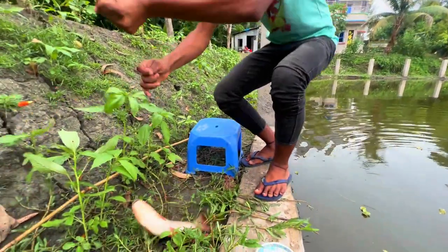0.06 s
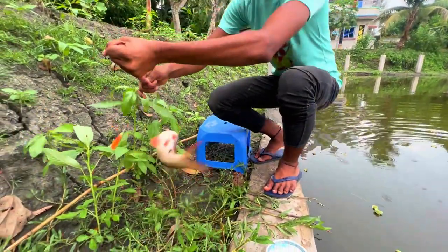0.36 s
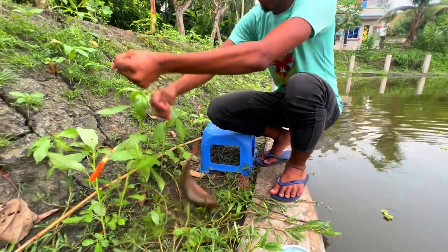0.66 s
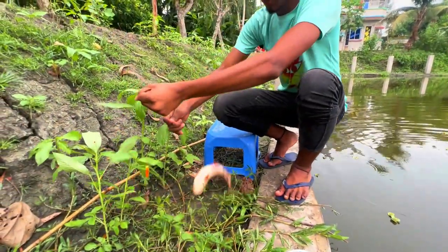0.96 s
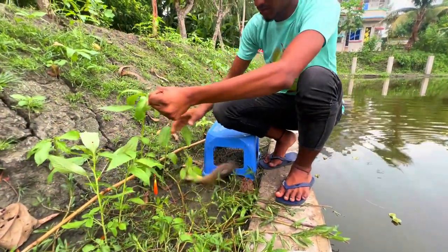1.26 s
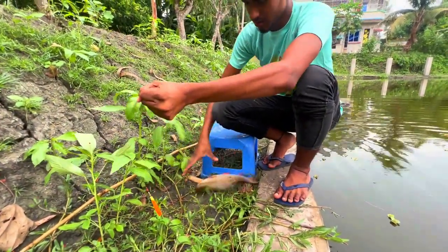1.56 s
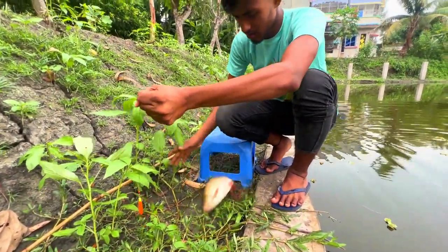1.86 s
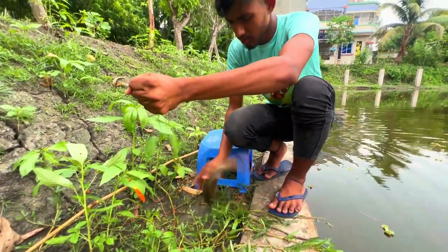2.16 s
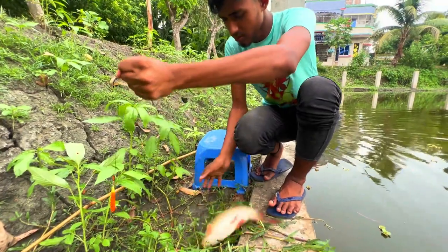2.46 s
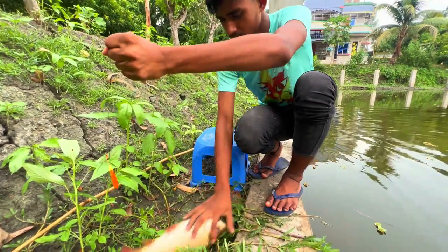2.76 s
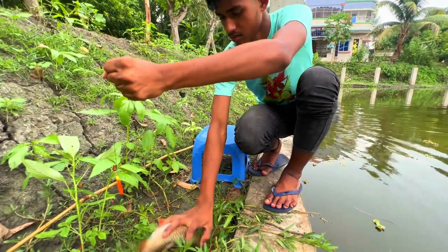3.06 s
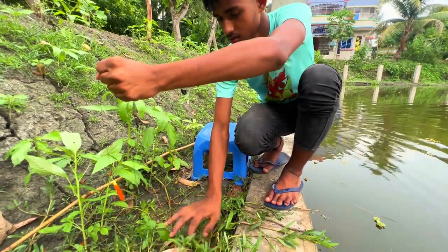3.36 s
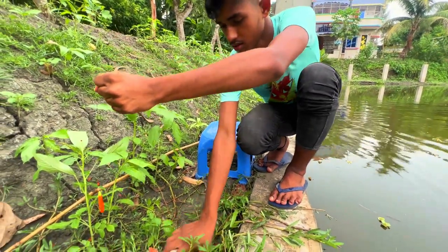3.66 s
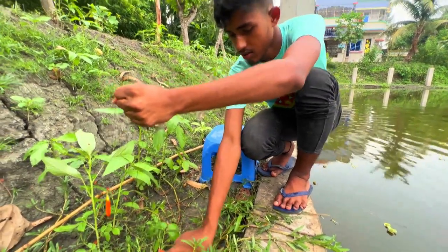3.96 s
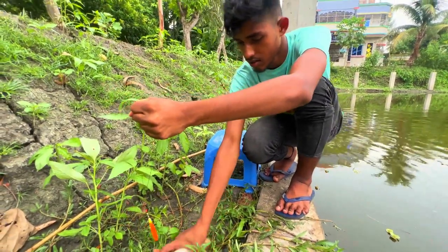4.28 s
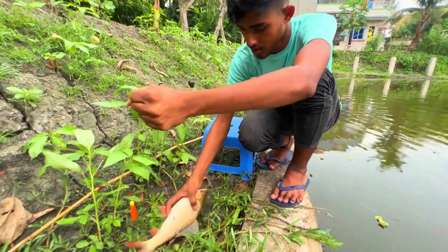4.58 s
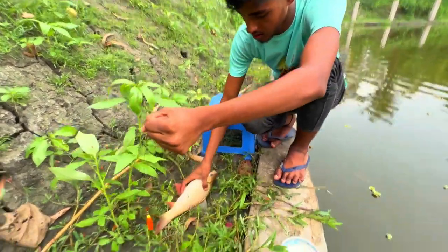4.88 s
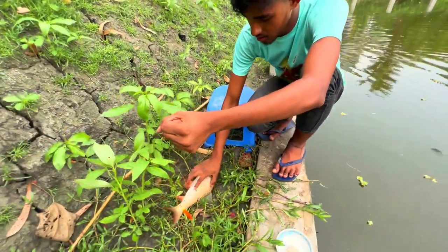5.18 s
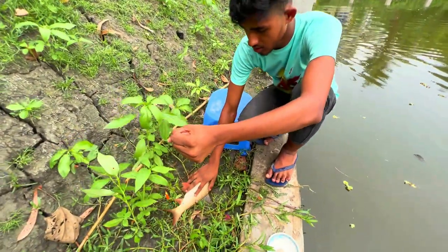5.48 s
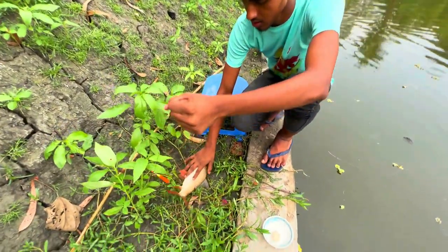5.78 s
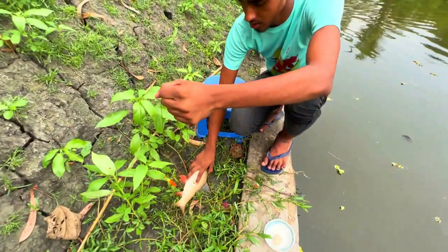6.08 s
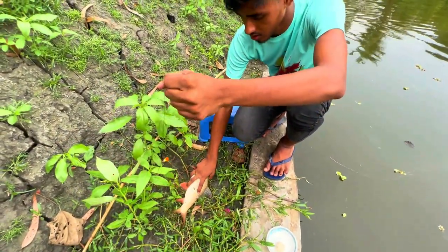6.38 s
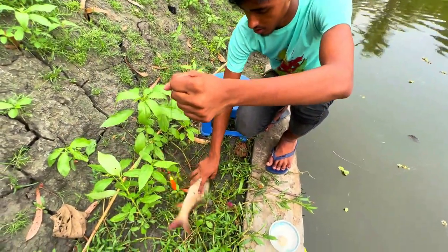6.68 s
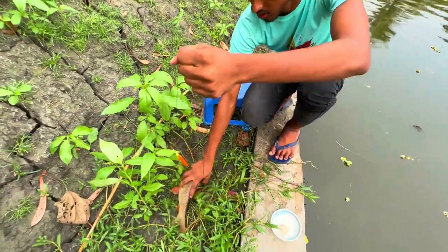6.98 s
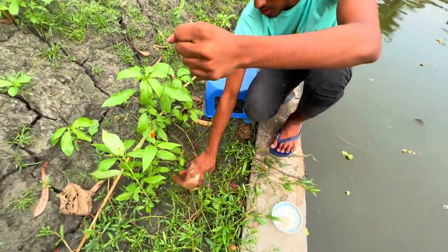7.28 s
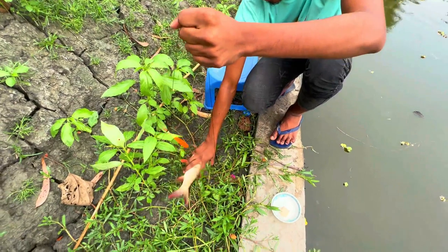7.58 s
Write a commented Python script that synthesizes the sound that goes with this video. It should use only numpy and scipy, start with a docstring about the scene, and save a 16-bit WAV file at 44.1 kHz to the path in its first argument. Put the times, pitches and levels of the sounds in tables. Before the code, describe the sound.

A close, leafy swish and a low thump open the sound at about 0.2 seconds. A fish then flaps in wet grass in irregular bursts of sharp smacks, dull thumps, small hollow pops and rustling. The strongest slaps land near 0.7, 1.3, 1.6, 1.9 and 2.6 seconds, with a stem snapping at 1.9. The flapping ends around 3.3 seconds and everything becomes much quieter. From about 4.7 to 7 seconds a hand slides the fish over the grass in three faint rubbing strokes, with a small snap at 5 seconds and light crackles from 6.7 seconds on. Small birds call throughout from the trees with falling chirps, soft whistles and echoing chips, and quick two-note calls repeat from about 6 seconds. Underneath are a thin, high insect hiss and a low outdoor rumble that swells slightly around 4.4 and 6.8 seconds.

```python
"""A hooked fish flaps on the grassy bank of a pond until a hand pins it down and works at the hook.
Its body swishes and slaps through wet grass, with low thumps and small hollow pops.
Blades crackle and stems snap, first under the fish and later as the hand slides it along.
Small birds chirp and echo in the trees, over a low outdoor rumble and a thin insect hiss."""
import sys
import numpy as np
from scipy import signal
from scipy.fft import rfft, irfft
from scipy.io import wavfile

SR = 44100
rng = np.random.default_rng(int(sys.argv[2]) if len(sys.argv) > 2 else 0)


def log_audio(samples):
    """Write samples as a 16-bit WAV file to the path given in sys.argv[1]."""
    # one column per channel
    frames = np.atleast_2d(samples).T
    # limit to full scale, then quantise
    limited = np.clip(frames, -1, 1)
    pcm = np.round(limited * 32767).astype(np.int16)
    wavfile.write(sys.argv[1], SR, pcm)


N = 340893
TIME = np.arange(N) / SR
CUTOFF_HZ = 16300


def from_db(db):
    """Turn decibels into a number to multiply a sound by."""
    return 10 ** (np.asarray(db) / 20)


def unit_power(x):
    """Scale a sound so that its average power is 1."""
    return x / np.sqrt(np.mean(x ** 2) + 1e-20)


def at_hz(points, hz):
    """Read between the rows of a table, giving every octave equal room."""
    freqs, values = np.transpose(points)
    return np.interp(np.log(hz + 1e-9), np.log(freqs), values)


def drift(per_s):
    """A random wobble of typical size 1 that heads for a new value per_s times a second."""
    targets = rng.standard_normal(int(N / SR * per_s) + 2)
    return unit_power(np.interp(TIME * per_s, np.arange(len(targets)), targets))


def swell(peak_s, hold_s, rise_s, fall_s):
    """A loudness curve that grows to 1 at peak_s, holds, then dies away."""
    return np.exp(np.minimum(TIME - peak_s, 0) / rise_s - np.maximum(TIME - peak_s - hold_s, 0) / fall_s)


def add(track, start_s, sound):
    """Mix a sound into a track at a given time."""
    start = max(int(start_s * SR), 0)
    part = sound[:max(N - start, 0)]
    track[start:start + len(part)] += part


def placed(x, pan_db, lead_s=0):
    """Make a sound stereo: the left ear gets it pan_db louder and lead_s earlier."""
    return np.array([x, np.interp(TIME - lead_s, TIME, x)]) * from_db([[pan_db / 2], [-pan_db / 2]])


def bandpass(x, edges_hz):
    """Keep the part of a sound between two frequencies."""
    return signal.sosfilt(signal.butter(2, edges_hz, "band", fs=SR, output="sos"), x)


def resonate(x, hz, sharpness):
    """Let a sound ring at one pitch; sharper rings longer."""
    return signal.lfilter(*signal.iirpeak(hz, sharpness, fs=SR), x)


def noise(colour, likeness, balance=None):
    """Stereo noise; tables set its tone colour, how alike the ears are and which is louder."""
    hz = np.arange(N // 2 + 1) * SR / N
    mid, side = rfft(rng.standard_normal((2, N)))
    alike = np.clip(at_hz(likeness, hz), -1, 1)
    pair = np.sqrt(1 + alike) * mid + np.sqrt(1 - alike) * side * [[1], [-1]]
    if balance is not None:
        pair = pair * from_db(at_hz(balance, hz) * np.array([[.5], [-.5]]))
    bass_cut = hz ** 2 / (hz ** 2 + (colour[0][0] / 2) ** 2)
    return unit_power(irfft(pair * bass_cut * from_db(at_hz(colour, hz)), N))


def band_noise(hz, width_hz):
    """Stereo noise in one band around a pitch."""
    return unit_power(bandpass(rng.standard_normal((2, N)), [hz - width_hz / 2, hz + width_hz / 2]))


# Tone colours of the low rumble and the airy hush: frequency_hz, relative_db
RUMBLE_COLOUR = [(22, -30), (35, -8.5), (54, 3.5), (85, -0.5), (300, -30), (600, -71)]
AIR_COLOUR = [(150, -3), (400, 4), (2000, -3), (5500, -11.5), (9500, -0.5), (10500, -62)]
# How alike far sounds are in the two ears: frequency_hz, likeness (0 to 1)
FAR_LIKENESS = [(100, 0.93), (640, 0)]
# Surges of the rumble: start_s, hold_s, level_db
SURGES = [(4.26, 0.37, -43), (6.686, 0.2, -46.5)]

def open_air(rumble_db=-47, fade_db_per_s=0.4, hush_db=-66.2):
    """A lumpy low rumble slowly fades and surges twice, under a soft hush."""
    surges = sum(from_db(db) * swell(s, hold_s, 0.13, 0.13) for s, hold_s, db in SURGES)
    fading = from_db(rumble_db - fade_db_per_s * TIME)
    level = np.hypot(fading, surges) * from_db(1.5 * drift(14))
    rumble = level * noise(RUMBLE_COLOUR, FAR_LIKENESS) * from_db([[1], [-1]])
    hush = from_db(hush_db + drift(7)) * noise(AIR_COLOUR, FAR_LIKENESS)
    return rumble + hush


# High insect buzzes: peak_s, pitch_hz, level_db
INSECT_SWELLS = [(4.1, 9460, -73), (6.15, 8910, -64.5)]

def insects(steady_hz=6710, steady_db=-68.5, width_hz=370):
    """Insects hiss steadily, while higher ones swell slowly and then fade."""
    out = from_db(steady_db + drift(1.7)) * band_noise(steady_hz, width_hz)
    for s, hz, db in INSECT_SWELLS:
        out += from_db(db) * swell(s, 0, rise_s=0.84, fall_s=0.12) * band_noise(hz, width_hz)
    return out


def far_chatter(level_db=-64, lull_s=5.46, lull_edge_s=0.3):
    """Countless far birds blur into a soft hiss, which drops away for a moment."""
    lull = 1 - np.exp(-((TIME - lull_s) / lull_edge_s) ** 2)
    return from_db(level_db) * lull * band_noise(3550, width_hz=3880)


# Tone colour of crisp grass: frequency_hz, relative_db
CRISP_COLOUR = [(900, -5), (2200, -10), (4000, 2), (9000, 0.5), (10500, -6), (15500, -14.5)]
# How alike sounds from the ground ahead are in the two ears: frequency_hz, likeness (0 to 1)
NEAR_LIKENESS = [(650, 0.93), (1400, 0.07)]

def blade_ticks(per_band_per_s=380, fade_s=.0016, spread_db=3.5):
    """Grass blades tick at random moments in six bands of pitch, making a fine crackle."""
    rush, out = noise(CRISP_COLOUR, NEAR_LIKENESS), 0
    edges_hz = np.geomspace(1200, CUTOFF_HZ, 7)
    for band in zip(edges_hz, edges_hz[1:]):
        starts = rng.random(N) < per_band_per_s / SR
        sizes = from_db(spread_db * np.minimum(rng.exponential(1, N), 2))
        fades = signal.lfilter([1], [1, -np.exp(-1 / (fade_s * SR))], starts * sizes + 1e-18)
        out = out + fades * bandpass(rush, band)
    return unit_power(out)


# Tone colour of a wet smack: frequency_hz, relative_db
SMACK_COLOUR = [(170, 2.5), (450, -7.5), (750, -4), (1200, -9), (4000, -10.5)]
# Which ear hears the ground ahead louder: frequency_hz, left_minus_right_db
NEAR_BALANCE = [(700, 3), (1300, 6.5), (2400, -5.5), (4400, 6.5), (8100, -1), (13000, -2.5)]

def squelch(swing_db=6):
    """Wet pockets between skin and mud open and close, each ringing for a moment."""
    rush, pockets = noise(SMACK_COLOUR, NEAR_LIKENESS, NEAR_BALANCE), 0
    for k, hz in enumerate(np.geomspace(250, 3200, 14)):
        opening = from_db(swing_db * np.tanh(drift(110)))
        pockets = pockets + (-1) ** k * resonate(rush, hz, sharpness=6) * opening
    return unit_power(pockets)


def grass_rustle(blades, wriggle_db=-54, rouse_s=1.94, tire_s=0.65, shake_db=-47, settle_s=0.058):
    """Grass rustles as the fish wriggles harder and then tires; each slap also shakes it."""
    hardest_db, last_slap_s = max(row[1] for row in SLAPS), SLAPS[-1][0]
    free = swell(0, last_slap_s, rouse_s, settle_s)   # the hand pins the fish after the last slap
    power = (from_db(wriggle_db) * free * swell(1.4, 0, rouse_s, tire_s)) ** 2
    for s, db, _, _ in SLAPS:
        shake = from_db(shake_db + 0.48 * (db - hardest_db))   # harder slaps shake it a little more
        power += (shake * swell(s, 0, 0.073, settle_s)) ** 2
    stems = unit_power(squelch() * from_db(10 * np.tanh(drift(90) / 2)))   # wet stems stick and let go
    return np.sqrt(power) * (from_db(-2.5) * blades + from_db(-1) * stems)


# Pitches at which the brushed leaves ring: pitch_hz
LEAF_PITCHES = [590, 1130, 2000, 2670]

def swish(blades, start_s=0.16, hold_s=0.052, level_db=-32, octaves_per_s=2.5):
    """The fish is pulled through leaves: their pitch rises as it speeds up, and their edges crackle."""
    rush = rng.standard_normal(N)
    leaves = sum((-1) ** k * resonate(rush, hz, sharpness=4) / np.sqrt(hz)
                 for k, hz in enumerate(LEAF_PITCHES))
    speed = 2 ** (octaves_per_s * np.clip(TIME - start_s - hold_s / 2, -hold_s, hold_s))
    rising = unit_power(np.interp(np.cumsum(speed) / SR, TIME, leaves, period=N / SR))
    pull = from_db(level_db) * swell(start_s, hold_s, rise_s=0.014, fall_s=0.027)
    return pull * (placed(rising, pan_db=3.5) + from_db(-5) * blades)


def crackle(colour, grain_db, grains_per_s):
    """Countless tiny touches of blades and droplets clump into a grainy noise."""
    rush = noise(colour, NEAR_LIKENESS, NEAR_BALANCE)
    return unit_power(rush * from_db(grain_db * drift(grains_per_s)))


# The fish hitting wet grass: peak_s, relative_db, fade_s, extra_smack_db
SLAPS = [(0.178, -36, 0.021, -6), (0.240, -37, 0.0072, 2.5), (0.605, -37.5, 0.0073, -3),
         (0.649, -27, 0.0031, 0), (0.671, -38, .002, 5), (0.677, -22, 0.0022, -6.5),
         (.684, -28, 0.0031, 1.5), (.86, -45.5, 0.013, -2), (.940, -40, 0.003, -0.5),
         (0.968, -38, 0.0032, 2), (1.007, -32, 0.0022, -2), (1.084, -50, 0.0045, 15.5),
         (1.286, -36, 0.0032, 4), (1.3325, -26.5, 0.0027, -1.5), (1.636, -32.5, 0.015, 2.5),
         (1.653, -28, 0.0055, -2), (1.755, -45, 0.0052, 5), (1.893, -24, 0.0047, -1),
         (2.154, -36, 0.0073, -3), (2.192, -39.5, 0.02, 3), (2.393, -43, 0.0025, -22),
         (2.5203, -35.5, 0.0041, -12.5), (2.576, -24, 0.0024, 0), (2.863, -44.5, 0.029, -1.5),
         (2.909, -35, 0.0066, 1.5), (3.071, -39.5, 0.0044, 1), (3.09, -39, 0.0057, 2),
         (3.109, -35, 0.0044, -1), (3.256, -32.5, 0.0013, -12), (3.264, -33, 0.0074, -5)]

def slaps(lead_s=.05, rise_share=0.82, tail_db=-22, tail_s=0.026, crisp_db=4.5, smack_db=1.5):
    """The body brushes the blades, lands with a wet smack, and the grass springs back."""
    crisp_power, smack_power = np.zeros((2, N))
    t = TIME[:SR // 3] - lead_s
    from_peak = np.where(t < 0, -t / rise_share, t)   # rises faster than it fades
    for s, db, fade_s, extra_smack_db in SLAPS:
        tail = from_db(tail_db) * np.exp(-from_peak / tail_s)
        power = np.exp(-from_peak / fade_s) ** 2 + tail ** 2
        add(crisp_power, s - lead_s, power * from_db(db) ** 2)
        add(smack_power, s - lead_s, power * from_db(db + extra_smack_db) ** 2)
    sway = from_db(drift(22.1) * np.array([[1], [-1]]))   # the fish twists from side to side
    crisp = np.sqrt(crisp_power) * sway * crackle(CRISP_COLOUR, grain_db=-1, grains_per_s=410)
    smack = np.sqrt(smack_power) * squelch()
    return from_db(crisp_db) * crisp + from_db(smack_db) * smack


# Low thumps and a few higher, hollow knocks and pops: start_s, level_db, pitch_hz
THUMPS = [(.231, -25, 179), (0.251, -20, 95), (0.622, -30.5, 238), (.964, -41, 520), (0.966, -34, 133),
          (1.306, -43, 410), (1.334, -33, 150), (1.628, -28.5, 770), (1.631, -35, 167), (1.899, -30.5, 117),
          (2.155, -29, 136), (2.2, -32.5, 166), (3.096, -26.5, 803)]

def thumps(rise_s=0.00061, fade_s=0.0085, pitch_drop=0.098):
    """Low thumps and a few higher, hollow knocks and pops ring briefly, sinking in pitch."""
    out, t = np.zeros(N), TIME[:SR // 5]
    fade = np.exp(-t / fade_s)
    shape = (1 - np.exp(-t / rise_s)) ** 2 * fade
    for s, db, hz in THUMPS:
        pitch_hz = hz * (1 - pitch_drop * (1 - fade))
        add(out, s, from_db(db) * shape / shape.max() * np.sin(2 * np.pi * np.cumsum(pitch_hz) / SR))
    return placed(out, pan_db=3)


def whistle(shape, pitch_ratio=1, waver=.011, flutter_db=3.5, wobbles_per_s=200):
    """One slightly unsteady bird note that follows rows of time_s, pitch_hz, level_db."""
    times, pitches, levels = np.transpose(shape)
    t = TIME[:int(times[-1] * SR)]
    bend, flutter = (np.interp(t * wobbles_per_s, np.arange(wobbles_per_s), targets)
                     for targets in rng.standard_normal((2, wobbles_per_s)))
    hz = np.interp(t, times, pitches) * pitch_ratio * (1 + waver * bend)
    db = np.interp(t, times, levels) + flutter_db * np.minimum(flutter, 1)
    tone = np.sqrt(2) * np.sin(2 * np.pi * np.cumsum(hz) / SR)
    return from_db(db) * signal.windows.tukey(len(t), .1) * tone


def song(shape, calls):
    """Repeat one note at each call's time, pitch and level."""
    out = np.zeros(N)
    for s, pitch_ratio, db in calls:
        add(out, s, from_db(db) * whistle(shape, pitch_ratio))
    return out


def tree_echo(x, early_db=8, early_s=0.018, tail_s=0.77, dull_hz=3600):
    """Nearby leaves smear a call at once; trunks and house walls add a long, duller tail."""
    t = TIME[:SR]
    early, late = rng.standard_normal((2, 2, SR))
    late = signal.sosfilt(signal.butter(2, dull_hz, fs=SR, output="sos"), late)
    echo = from_db(early_db) * np.exp(-t / early_s) * early + 2 * from_db(-60 * t / tail_s) * late
    return signal.fftconvolve(x[None], unit_power(echo) / np.sqrt(SR), axes=1)[:, :N]


def perch(x, echo_db, pan_db=8.5, lead_s=-0.00032):
    """Put a bird in the trees: the farther it is, the more of its call is echo."""
    return (placed(x, pan_db, lead_s) + from_db(echo_db) * tree_echo(x)) / np.hypot(1, from_db(echo_db))


# The shape of a "tew": time_s, pitch_hz, relative_db
TEW_NOTE = [(0, 3980, -13), (.007, 4785, 0), (.02, 4410, -3.5), (.07, 2790, -14.5)]
# Each "tew": start_s, pitch_ratio, level_db
TEW_CALLS = [(0.319, 1, -39.5), (1.506, .94, -42), (3.549, 0.97, -39)]

def tew_bird():
    """A bird on the left calls a falling "tew"."""
    return perch(song(TEW_NOTE, TEW_CALLS), echo_db=-4, pan_db=2.5, lead_s=0.00047)


# Soft sliding whistles: start_s, length_s, start_hz, end_hz, level_db
SLIDES = [(0.785, 0.051, 3320, 2870, -60), (1.03, 0.055, 2770, 3090, -48.5),
          (1.225, 0.095, 2565, 2300, -53)]
# Short low pips: start_s
PIP_TIMES = [3.482, 4.035, 4.342, 6.204]

def slides_and_pips(pip_hz=2200, pip_s=0.031, pip_db=-61):
    """A bird whistles soft slides; later, short low pips linger, mostly just after the far chips."""
    out = np.zeros(N)
    for s, length_s, start_hz, end_hz, db in SLIDES:
        middle = (length_s / 2, (start_hz + end_hz) / 2, db)
        add(out, s, whistle([(0, start_hz, db - 11), middle, (length_s, end_hz, db - 9)]))
    pip = [(0, pip_hz, pip_db - 13), (pip_s / 2, pip_hz, pip_db), (pip_s, pip_hz, pip_db - 10)]
    for s in PIP_TIMES:
        add(out, s, whistle(pip))
    return out + from_db(-7) * tree_echo(out)


# Hollow wet pops: start_s, level_db
POPS = [(0.892, -36), (.963, -30), (.990, -34), (1.077, -34.5), (1.152, -42), (1.17, -41), (1.188, -40),
        (1.468, -37), (1.865, -39.5), (2.031, -39.5), (2.211, -36.5), (2.41, -40), (7.172, -48.5)]

def pops(low_hz=842, upper_ratio=1.545, burst_s=0.0015):
    """Small wet air pockets tear open with a click that rings at two pitches, never quite the same."""
    out, t = np.zeros(N), TIME[:SR // 20]
    loudest_db = max(db for _, db in POPS)
    for s, db in POPS:
        burst = rng.standard_normal(len(t)) * t * np.exp(-t / burst_s)
        upper_db = db + 2 + 0.72 * (db - loudest_db)   # louder pops are brighter
        for hz, ring_db in ((low_hz, db), (low_hz * upper_ratio, upper_db)):
            ring = resonate(burst, hz * np.exp(.06 * rng.standard_normal()), sharpness=8)
            add(out, s, from_db(ring_db) * ring / np.abs(ring).max())
    return placed(out, pan_db=5)


# Single blades springing free: peak_s, level_db
FLICKS = [(1.372, -41.5), (3.192, -45), (6.657, -56), (6.709, -54), (6.765, -46), (6.872, -47), (7.05, -46),
          (7.624, -46)]

def flicks(blades, fade_s=0.01):
    """A wet blade springs free with a short, bright crackle."""
    return sum(from_db(db) * swell(s, 0, fade_s / 2, fade_s) for s, db in FLICKS) * blades


# Stems breaking: peak_s, level_db, fade_s, pitch_hz
SNAPS = [(1.893, -24, 0.0048, 1930), (4.173, -49.5, 0.005, 1780), (5.01, -36.5, 0.0081, 1910),
         (6.183, -48.5, 0.0089, 1880), (6.768, -45, 0.0079, 2030), (6.915, -46.5, 0.0062, 644)]

def snaps(half_width_octaves=0.41, upper_ratio=2.82, upper_db=-3):
    """A stem snaps under the fish or the hand and rings in two broad bands as it bends."""
    out, fibres = 0, noise(CRISP_COLOUR, NEAR_LIKENESS, NEAR_BALANCE)
    for s, db, fade_s, low_hz in SNAPS:
        for hz, ring_db in ((low_hz, db), (low_hz * upper_ratio, db + upper_db)):
            stem = unit_power(bandpass(fibres, hz * 2 ** (half_width_octaves * np.array([-1, 1]))))
            out = out + from_db(ring_db) * swell(s, 0, fade_s, fade_s) * stem
    return out


# The shape of a "chip": time_s, pitch_hz, relative_db
CHIP_NOTE = [(0, 4400, 2), (.03, 2217, -7)]
# Each "chip": start_s
CHIP_TIMES = [1.999, 2.277, 2.487, 3.378, 3.916, 4.232, 6.384, 6.676]

def chip_bird(level_db=-51):
    """A far bird chips away, heard only as an echo through the trees."""
    return tree_echo(song(CHIP_NOTE, [(s, 1, level_db) for s in CHIP_TIMES]))


# The shape of a "seeu": time_s, pitch_hz, relative_db
SEEU_NOTE = [(0, 4800, -1), (.008, 5410, 2), (.04, 4496, -2), (.105, 3040, -15)]
# Each "seeu": start_s, pitch_ratio, level_db
SEEU_CALLS = [(3.552, 0.97, -45.5), (6.008, 0.96, -45), (7.402, 0.94, -45)]

def seeu_bird():
    """A bird deep in the trees slides down a longer "seeu"."""
    return perch(song(SEEU_NOTE, SEEU_CALLS), echo_db=8)


# The shape of the falling "tu": time_s, pitch_hz, relative_db
TU_NOTE = [(0, 3510, -23), (.012, 2817, -1), (.024, 2390, -17.5), (.045, 2030, -15.5)]
# Each "wit-tu": start_s, top_pitch_hz, level_db
WIT_TU_CALLS = [(3.876, 5000, -50), (5.895, 4490, -51.5), (6.498, 4850, -43), (6.822, 5270, -44),
                (7.105, 5300, -43.5), (7.436, 4610, -44.5)]

def wit_tu_bird(start_hz=3100, wit_s=.04, swell_db=8.5, tu_after_s=.066):
    """A bird repeats a "wit" that swells and climbs ever faster, then a short falling "tu"."""
    out = np.zeros(N)
    for s, top_hz, db in WIT_TU_CALLS:
        middle = (wit_s / 2, start_hz + 0.44 * (top_hz - start_hz), db - swell_db / 2)
        add(out, s, whistle([(0, start_hz, db - swell_db), middle, (wit_s, top_hz, db)]))
        add(out, s + tu_after_s, from_db(db - 0.5) * whistle(TU_NOTE))
    return perch(out, echo_db=1)


# Tone colour of wet skin rubbing on grass: frequency_hz, relative_db
RUB_COLOUR = [(200, -5), (1200, -5), (3500, -15), (8500, -15), (11500, -50)]
# Strokes of the hand: start_s, hold_s, rub_db, blade_db
STROKES = [(4.68, 0.3, -59, -67), (5.536, 0.35, -57, -70.5), (6.576, 0.34, -55, -60.5)]

def hand(blades):
    """The hand slides the fish over the grass: skin rubs and blades crackle."""
    skin, out = crackle(RUB_COLOUR, grain_db=3, grains_per_s=110), 0
    for s, hold_s, rub_db, blade_db in STROKES:
        stroke = swell(s, hold_s, rise_s=0.097, fall_s=0.17)
        out = out + stroke * (from_db(rub_db) * skin + from_db(blade_db) * blades)
    return out


def far_drone(end_db=-65, rise_db_per_s=6):
    """A faint, hollow drone far off grows towards the end."""
    return from_db(end_db + rise_db_per_s * (TIME - TIME[-1])) * band_noise(800, width_hz=180)


def scene():
    """The fish close ahead, with the birds and the open air around it."""
    blades = blade_ticks()
    fish = slaps() + thumps() + pops() + swish(blades) + grass_rustle(blades)
    bank = flicks(blades) + hand(blades) + snaps()
    birds = tew_bird() + seeu_bird() + wit_tu_bird() + chip_bird() + slides_and_pips()
    background = open_air() + insects() + far_drone() + far_chatter()
    return fish + bank + birds + background


def record(dry):
    """Cut away the highest treble steeply."""
    return signal.sosfilt(signal.ellip(10, .1, 80, CUTOFF_HZ, fs=SR, output="sos"), dry)


dry = scene()
out = record(dry)
log_audio(out)
```